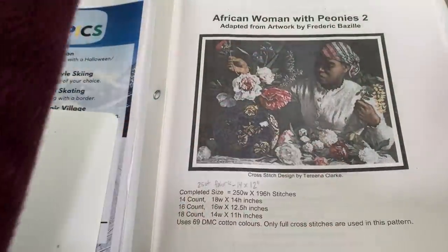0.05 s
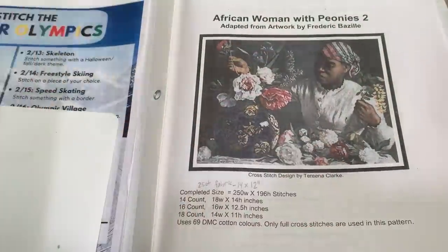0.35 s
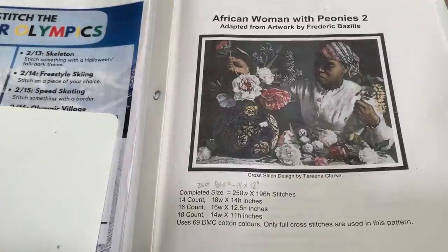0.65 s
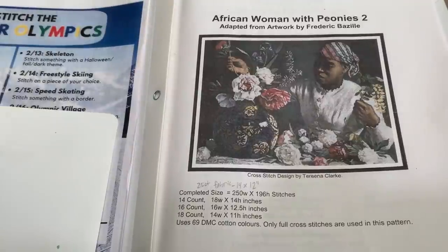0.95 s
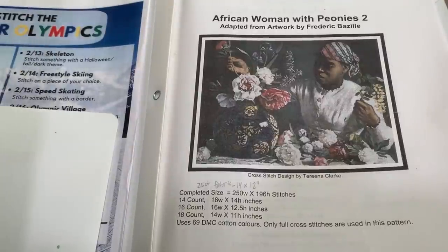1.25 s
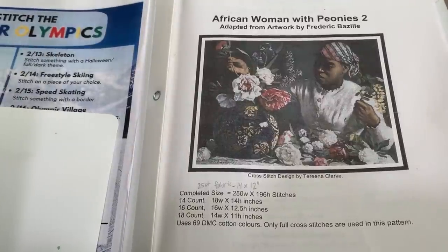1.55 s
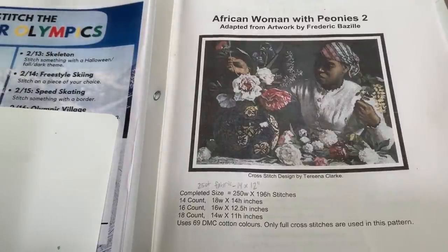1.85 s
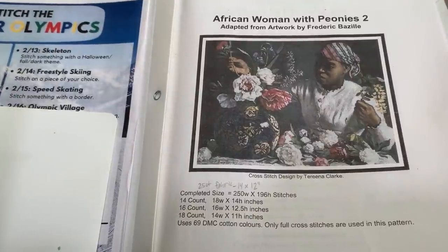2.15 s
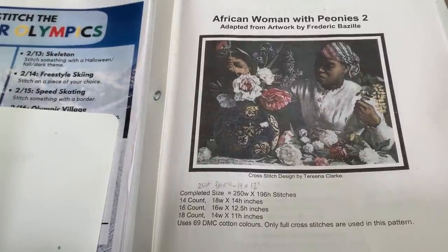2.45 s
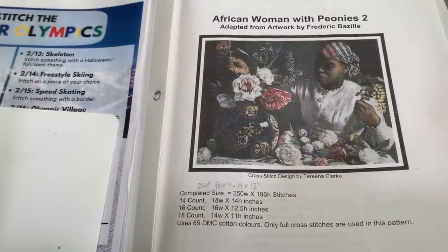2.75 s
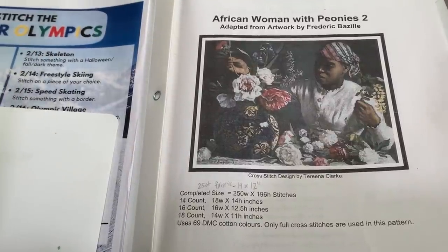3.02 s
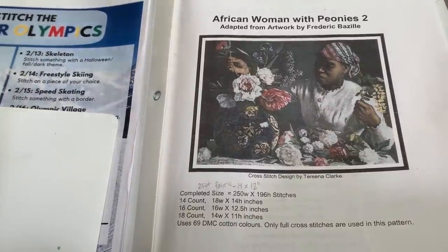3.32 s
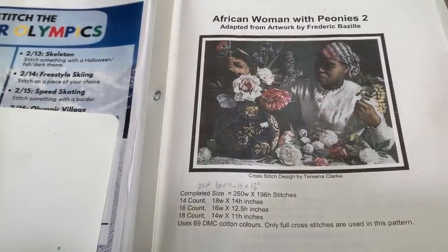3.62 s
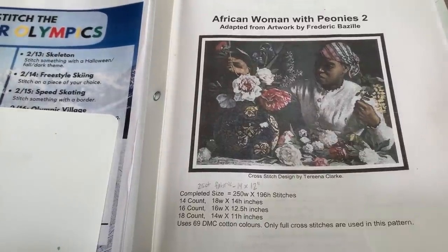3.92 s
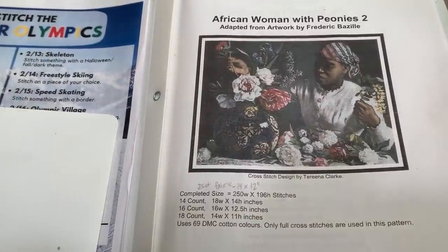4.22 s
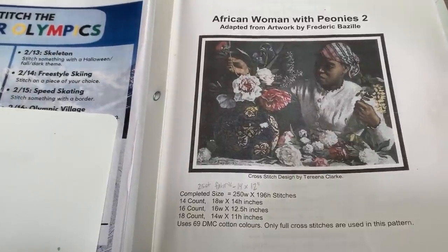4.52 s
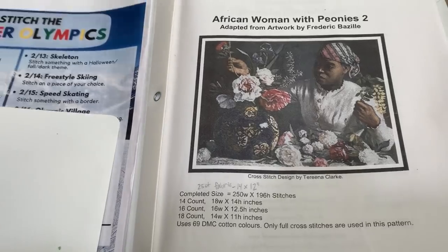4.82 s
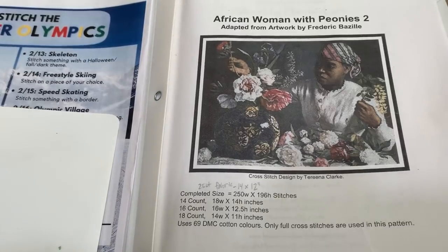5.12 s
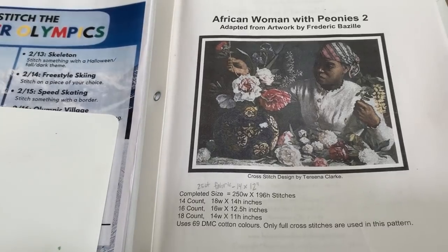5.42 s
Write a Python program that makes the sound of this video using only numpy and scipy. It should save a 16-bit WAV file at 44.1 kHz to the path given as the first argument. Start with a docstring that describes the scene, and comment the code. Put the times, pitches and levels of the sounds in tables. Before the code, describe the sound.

Plastic page sleeves rustle, scrape and crackle as hands leaf through a binder, with a few pages slapping down.

```python
"""A small room, close up on a ring binder: hands leaf through paper pages in plastic sleeves.
Friction, a stream of tiny slips, makes the sleeves scrape, hiss and rasp; the bending sheets flutter
and creak. Fingers brush the pages and the heel of the hand rubs the binder. Now and then a sleeve
crackles, the cover is bumped, or a sheet snaps or slaps down and thumps the stack.
Two microphone ports hear it all in stereo, with quick echoes off the desk and a short room tail."""
import sys
import numpy as np
from scipy import signal
from scipy.fft import rfft, irfft
from scipy.io import wavfile
from scipy.ndimage import uniform_filter1d

SR = 44100
rng = np.random.default_rng(int(sys.argv[2]) if len(sys.argv) > 2 else 0)


def dump(signal):
    """Clip the signal to [-1, 1] and save it as 16-bit WAV at the path in sys.argv[1]."""
    limited = np.clip(np.atleast_2d(signal).T, -1, 1)
    pcm = np.round(limited * 32767).astype(np.int16)
    wavfile.write(sys.argv[1], SR, pcm)


N = 250047
T = np.arange(N) / SR
HZ = np.fft.rfftfreq(N, 1 / SR)


def gain_of(db):
    """Decibels to amplitude."""
    return 10 ** (np.asarray(db) / 20)


def unit_rms(x):
    """Scales to rms 1."""
    return x / np.sqrt(np.mean(x ** 2) + 1e-20)


def curve(points, hz, column=1):
    """One column of a table, joined by straight lines over log frequency."""
    table = np.array(points, float)
    return np.interp(np.log(hz + 1), np.log(table[:, 0] + 1), table[:, column])


def equalise(x, spectrum):
    """Zero-phase EQ along a curve of (f/Hz, level/dB)."""
    return irfft(rfft(x) * gain_of(curve(spectrum, HZ)), N)


def add(mix, start, sound):
    """Lays a sound into the mix at start seconds."""
    part = mix[max(0, round(start * SR)):][:len(sound)]
    part += sound[:len(part)]


def wander(rate):
    """Smooth random drift of rms 1 that changes about rate times a second."""
    return unit_rms(irfft(rfft(rng.standard_normal(N)) * np.exp(-(HZ / rate) ** 2), N))


def resonate(x, hz, width_hz):
    """A steep resonance that follows the pitch curve hz."""
    turn = np.exp(2j * np.pi * np.cumsum(hz) / SR)
    pole = np.exp(-np.pi * width_hz / SR)
    return (turn * signal.lfilter([(1 - pole) ** 2], [1, -2 * pole, pole * pole], x / turn)).real


def binder_colour(x, spectrum, size=4096):
    """Minimum-phase EQ: a spectrum with the binder's hollow resonances on top."""
    # resonances of the open binder and the space above it: f/Hz, width/Hz, level/dB
    hollow = [(297, 44, 2), (655, 190, 2), (924, 190, 4), (1720, 165, 7), (2660, 700, 8), (3400, 230, -4)]
    hz = np.fft.rfftfreq(size, 1 / SR)
    db = curve(spectrum, hz) + sum(peak / (1 + (2 * (hz - f) / width) ** 2) for f, width, peak in hollow)
    log_gain = np.log(gain_of(np.r_[db, db[-2:0:-1]]))
    taps = np.fft.ifft(np.exp(np.conj(signal.hilbert(log_gain)))).real[:size // 2]
    return signal.fftconvolve(x, taps)[:len(x)]


def slips(per_s, spread_db, smooth, judder_db, judder_hz):
    """Friction: tiny slips of uneven size over smooth rubbing, coming in clumps."""
    sizes = gain_of(spread_db * np.minimum(rng.exponential(1, N), np.pi)) * rng.choice([-1, 1], N)
    clicks = unit_rms(sizes * (rng.random(N) < per_s / SR))
    return (clicks + smooth * rng.standard_normal(N)) * gain_of(judder_db * wander(judder_hz))


def patchy(x, depth_db, bins, frames):
    """As the sheet bends, the bands that it radiates best come and go."""
    bands = signal.stft(x, nperseg=1024, noverlap=768)[2]
    patches = rng.standard_normal(bands.shape)
    for axis, length in ((0, bins), (1, frames), (1, frames)):
        patches = uniform_filter1d(patches, length, axis)
    return signal.istft(bands * gain_of(depth_db * unit_rms(patches)), nperseg=1024, noverlap=768)[1][:N]


def swell(start, rise, hold, fade):
    """One hand movement gathers speed, holds, then falls 20 dB in fade seconds (25 ms at least)."""
    rising = np.clip((T - start) / max(rise, 1 / SR), 0, 1) ** 1.14
    stopping = np.maximum(T - start - rise - hold, 0) / max(fade, .025)
    return rising * gain_of(-20 * np.minimum(stopping ** 1.024, 10))


def envelopes(strokes):
    """One envelope for each level column of a table of strokes; overlaps add in power."""
    return np.sqrt(sum(np.outer(gain_of(levels), swell(start, rise, hold, fade)) ** 2
                       for start, rise, hold, fade, *levels in strokes))


def flutter(pressed):
    """Pressing stiffens a bent sheet and lifts its two resonances; slack, it flaps loosely."""
    # tone of the loose flapping: f/Hz, level/dB
    flap_tone = [(20, -55.5), (45, -14), (80, -4.5), (150, 3), (300, -8.5), (420, -16), (650, -16),
                 (1500, -50.5)]
    slack_hz, pressed_hz = 175, 359
    pitch_hz = (slack_hz + (pressed_hz - slack_hz) * pressed) * np.exp(0.14 * wander(17.6))
    flaps = slips(per_s=260, spread_db=1.5, smooth=0.61, judder_db=0.5, judder_hz=56)
    fundamental = unit_rms(resonate(flaps, pitch_hz, width_hz=68))
    overtone = pressed * gain_of(-14.5) * unit_rms(resonate(flaps, 1.95 * pitch_hz, width_hz=210))
    wobble = signal.sosfilt(signal.butter(2, 100, "high", fs=SR, output="sos"), fundamental + overtone)
    loose = gain_of(4.5) * (1 - pressed)
    return (unit_rms(wobble) + loose * unit_rms(binder_colour(flaps, flap_tone))) / np.hypot(1, loose)


def scrape(pressed, lightness_db):
    """An edge scrapes and small creases give way; its ring sinks when pressed and wanders as it bends."""
    # tone of the scraping edge: f/Hz, level/dB
    edge_tone = [(150, -19.5), (400, -12), (680, -14.5), (900, 3.5), (1400, -2), (2000, 0), (2800, -4.5),
                 (3600, -6), (5000, -11), (8000, -13.5)]
    slack_hz, pressed_hz = 1520, 1080
    friction = slips(per_s=600, spread_db=3.3, smooth=.55, judder_db=1.3, judder_hz=80)
    crinkles = slips(per_s=110, spread_db=-1, smooth=0, judder_db=0.5, judder_hz=7.8)
    drive = friction + gain_of(-9.5) * crinkles
    ring_hz = (slack_hz + (pressed_hz - slack_hz) * pressed) * np.exp(0.12 * wander(30))
    ring = gain_of(-15) * unit_rms(resonate(drive, ring_hz, width_hz=800))
    edge = unit_rms(binder_colour(patchy(drive, depth_db=2.8, bins=4, frames=6), edge_tone)) + ring
    # a light touch scrapes brighter: tilt around 2 kHz
    tilt_db = np.clip(1.14 * lightness_db - 1.5, -5, 5)
    low = irfft(rfft(edge) / (1 + (HZ / 2000) ** 4), N)
    high = edge - low
    low_gain, high_gain = gain_of(-tilt_db), gain_of(tilt_db)
    return (low_gain * low + high_gain * high) / np.hypot(low_gain * low.std(), high_gain * high.std())


def hiss():
    """The plastic faces slip over each other in a bright, shifting hiss."""
    # tone of the sliding faces: f/Hz, level/dB
    face_tone = [(1000, -33), (3000, -11.5), (4100, -5), (4700, -6.5), (5500, -4.5), (7400, -5), (8600, 2),
                 (10200, -1.5), (11300, -2.5), (13300, -2.5), (14500, -2.5), (15800, -3)]
    faces = slips(per_s=2200, spread_db=3.2, smooth=.7, judder_db=1.3, judder_hz=30)
    return unit_rms(binder_colour(patchy(faces, depth_db=4.0, bins=6, frames=7), face_tone))


def sliding():
    """Each stroke of a sleeve over the stack blends flutter, scrape and hiss under a wavering hand."""
    # sleeve strokes: t/s, rise/s, hold/s, fade/s, flutter/dB, scrape/dB, hiss/dB
    strokes = [(0.0, 0.001, 0.02, 0.09, -72, -55, -51.5), (.17, 0.084, 0.046, 0.17, -82, -84, -56),
               (.272, 0.015, .012, 0.06, -76, -58.5, -57), (.383, 0.0016, 0.11, 0.14, -61, -59, -44.5),
               (.495, 0.033, 0.16, 0.12, -65, -59, -46), (.8, 0.032, 0.059, 0.04, -70.5, -63, -59),
               (1.02, 0.03, 0.02, 0.06, -66, -60.5, -59), (1.308, 0.0084, 0.0052, 0.025, -74, -72, -70.5),
               (1.41, 0.11, 0.18, 0.8, -72, -60, -54), (1.835, 0.064, 0.052, 0.35, -49.5, -56, -49),
               (2.174, 0.058, 0.11, -0.04, -71, -62, -59), (2.37, 0.1, 0.044, 0.13, -71.5, -55, -48.5),
               (2.65, 0.091, 0.033, 0.17, -61.5, -51, -44.5), (2.86, 0.043, 0.081, 0.06, -62, -53.5, -44),
               (3.03, 0.071, 0.076, 0.18, -52.5, -51, -47), (3.08, 0.15, 0.068, 0.04, -68, -42.5, -42.5),
               (3.25, 0.032, 0.037, 0.06, -56, -43.5, -60), (3.369, 0.012, 0.018, 0.1, -58, -37.5, -56),
               (3.39, 0.028, 0.039, 0.04, -49, -35.5, -37.5), (3.47, 0.01, 0.02, 0.34, -68.5, -60.5, -55.5),
               (3.58, 0.017, 0.017, 0.1, -59, -56, -53), (3.605, 0.07, 0.057, 0.04, -44.5, -35.5, -35.5),
               (3.745, 0.0061, 0.0085, 0.07, -55, -57.5, -52), (3.779, 0.02, 0.031, 0.38, -68, -63, -62),
               (3.934, 0.24, 0.04, 0.15, -53, -45.5, -43.5), (4.14, 0.0081, 0.093, 0.1262, -63, -44, -39.5),
               (4.192, 0.024, 0.011, 0.058, -69, -35.5, -27.5), (4.242, 0.008, 0.0088, 0.03, -58, -41, -36),
               (4.303, 0.0086, 0.015, 0.025, -37, -46.5, -33.5),
               (4.345, 0.016, 0.24, -0.04, -62.5, -70, -82.5),
               (4.525, 0.0088, 0.023, 0.0552, -57, -46.5, -42.5),
               (4.575, 0.011, 0.0064, 0, -69.5, -58.5, -49.5), (4.672, 0.016, 0.018, 0.13, -51, -50, -49),
               (4.787, 0.015, 0.021, 0.026, -47, -53.5, -51.5),
               (4.845, 0.003, 0.012, 0.0259, -40.5, -47, -39), (4.86, 0.0072, 0.028, 0.19, -62, -54.5, -50),
               (5.03, 0.13, 0.054, 0.11, -78, -53, -41.5), (5.3, 0.026, 0.05, 0.4, -88, -61.5, -53),
               (5.385, 0.057, 0.037, 0.07, -84.5, -61, -48), (5.508, 0.048, 0.076, 0, -100, -66, -51.5)]
    rest = gain_of([[-77.5], [-84], [-93]])  # the hands never lie quite still
    waver_db = wander(24)
    flutter_gain, scrape_gain, hiss_gain = np.hypot(envelopes(strokes), rest) * gain_of(waver_db)
    pressed = scrape_gain / (scrape_gain + gain_of(-47))  # 0 slack, 1 fully pressed
    lightness_db = 20 * np.log10(hiss_gain / scrape_gain)  # a light touch has more hiss than scrape
    return (flutter_gain * flutter(pressed) + scrape_gain * scrape(pressed, lightness_db)
            + hiss_gain * hiss())


def second_rub():
    """A quieter second rub on the same strokes, there to widen the stereo."""
    # tone of the second rub, with narrow bands cut near 4.7 and 8.9 kHz: f/Hz, level/dB
    rub_tone = [(150, -30), (600, -11), (2000, -12), (3700, -8), (4200, -15), (4500, -36), (5000, -36),
                (5600, -10), (7000, -19), (8400, -19), (8900, -30), (9600, -17), (15000, -12)]
    return equalise(sliding(), rub_tone)


def still_air():
    """A faint, steady bed of room tone, mostly low rumble."""
    # tone of the still air: f/Hz, level/dB
    air_tone = [(20, -16), (60, 26), (200, -13.5), (500, -5.5), (1500, -19.5), (4000, -1), (15000, -11.5)]
    return gain_of(-76.5) * unit_rms(binder_colour(rng.standard_normal(N), air_tone))


def cover_bumps():
    """Bumps ring the hollow cover for a moment."""
    # bumps on the cover: t/s, level/dB
    bumps = [(.002, -40.5), (.012, -65), (.024, -39.5), (.438, -50)]
    # modes of the cover: f/Hz, level/dB, t60/s
    modes = [(442, -8, 0.077), (517, 0, 0.069), (650, 0.5, 0.05), (720, 0, 0.058), (855, -4, 0.058),
             (1390, 3, 0.024), (1540, -12, 0.05)]
    t, out = np.arange(SR // 4) / SR, np.zeros(N)
    for start, db in bumps:
        ring = sum(gain_of(level - 60 * t / t60) * np.sin(2 * np.pi * f * rng.uniform(1.0, 1.02) * t)
                   for f, level, t60 in modes)
        add(out, start, gain_of(db) * ring)
    return out


def impact(spectrum, rattle, decay_s, lag_ms, sink, size=8192):
    """A push and a dying rattle, pitched down by the ratio sink; has the energy of 10 ms at rms 1."""
    t, hz = np.arange(size) / SR, np.fft.rfftfreq(size, 1 / SR)
    push = binder_colour(1. * (t == 0), spectrum)
    burst = rng.standard_normal(size) * np.exp(-t / decay_s)
    tail = binder_colour(burst, [(f * sink, db) for f, db in spectrum])
    wave = unit_rms(push) + rattle * unit_rms(tail)
    # the sheets carry low bending waves slower, so the pitch drops
    lag_s = lag_ms / 1000 * np.sqrt(1000 / (hz + 60))
    wave = irfft(rfft(wave) * np.exp(-2j * np.pi * np.cumsum(lag_s) * hz[1]), size)
    wave *= np.minimum(1, 2 * (1 - t / t[-1]))  # fade out
    return wave / np.linalg.norm(wave) * np.sqrt(SR / 100)


def slaps():
    """Each snap or slap layers a thump of the stack, a knock of the sheet and a tick of plastic."""
    # snaps and slaps: t/s, thump/dB, knock/dB, tick/dB, thump pitch/Hz, knock pitch/Hz
    hits = [(0.0112, -49, -45, -33, 553, 900), (0.0196, -54, -44, -44, 526, 1500),
            (0.0256, -56, -56, -37.5, 526, 900), (0.437, -40.5, -57, -78, 264, 900),
            (0.53, -64, -55, -75, 300, 900), (1.6028, -24, -31.5, -37, 198, 1020),
            (1.6832, -28, -40.5, -48, 187, 1040), (2.0997, -38.5, -40.5, -38, 320, 2020),
            (2.11, -38.5, -67, -45, 250, 600), (2.311, -46.5, -61.5, -69, 92.6, 694),
            (2.578, -56, -86, -77.5, 141, 900), (2.751, -41.5, -47.5, -52, 131, 620),
            (2.9386, -46.5, -31.5, -30, 290, 1820), (3.3796, -55, -45, -69, 373, 1220),
            (3.444, -44.5, -53, -60, 203, 1000), (3.462, -56, -47, -62, 310, 1120),
            (3.568, -56, -60, -70, 161, 1500), (3.763, -36.5, -46.5, -72, 125, 1000),
            (3.835, -45, -52, -70, 190, 1200), (4.288, -45, -40.5, -40, 300, 1510),
            (4.304, -34.5, -31.5, -44, 243, 1630), (4.442, -44.5, -52, -85, 308, 1068),
            (4.450, -45, -52, -78, 280, 2570), (4.507, -47.5, -47, -61, 283, 1190),
            (4.5362, -40.5, -48.5, -45.5, 166, 1800), (4.651, -41, -81, -95, 178, 600),
            (4.7016, -24, -26.5, -26.5, 183, 1600), (4.7052, -32.5, -30.5, -31, 198, 616),
            (4.782, -38.5, -48, -50, 203, 470), (4.8487, -36, -40, -38.5, 257, 2650),
            (4.8549, -34, -41, -34.5, 194, 1000), (4.931, -45, -62.5, -70.5, 112, 600),
            (5.248, -61.5, -72, -78, 323, 600), (5.448, -63, -74, -68, 270, 900)]
    # tone of the stack's thump at a pitch of 200 Hz: f/Hz, level/dB
    thump_tone = [(20, -47.5), (45, -12), (80, -1), (160, 2.5), (270, -1), (400, -10), (650, -17.5),
                  (1500, -43.5)]
    # tone of the sheet's knock: f/Hz, level/dB
    knock_tone = [(150, -20.5), (400, -2.5), (660, 4.5), (950, -2), (1300, -0.5), (1900, -2.5), (2900, -2),
                  (3800, -5.5), (6000, -11), (10000, -47)]
    # tone of the plastic's tick: f/Hz, level/dB
    tick_tone = [(1200, -37.5), (3500, -10), (4800, 12.5), (7300, -12.5), (8800, 7.5), (10500, -7),
                 (12300, -0.5), (15800, -11.5)]
    out, hz = np.zeros(N), np.geomspace(100, 12000, 60)
    for start, thump_db, knock_db, tick_db, thump_hz, knock_hz in hits:
        tuned_thump = [(f * thump_hz / 200, db) for f, db in thump_tone]
        for delay_s, drop_db in ((0, 0), (0.031, -19.5)):  # the springy stack rebounds once
            thump = impact(tuned_thump, rattle=0.57, decay_s=0.018, lag_ms=2.404, sink=0.46)
            add(out, start + delay_s, gain_of(thump_db + drop_db) * thump)
        peak_db = 10.5 * np.exp(-(np.log2(hz / knock_hz) / 0.49) ** 2)
        tuned_knock = list(zip(hz, curve(knock_tone, hz) + peak_db))
        knock = impact(tuned_knock, rattle=1.0, decay_s=0.0058, lag_ms=0.674, sink=0.94)
        tick = impact(tick_tone, rattle=.6, decay_s=.0022, lag_ms=.5, sink=.95)
        add(out, start, gain_of(knock_db) * knock + gain_of(tick_db) * tick)
    return out


def swish():
    """Countless tiny slips between two slick faces: a dense, silky sheen high in the treble."""
    # plastic gliding on plastic: t/s, rise/s, hold/s, fade/s, level/dB
    glides = [(.19, 0.034, 0.081, 0, -60), (1.035, 0.049, 0.068, -0.02, -55.5),
              (1.312, 0.0078, 0.0042, -0.5, -59), (1.345, 0.039, 0.015, 0.15, -54),
              (1.48, 0.046, .06, 0.2, -54), (3.08, 0.088, 0.13, 0.03, -41), (3.96, 0.2, 0.12, -0.22, -43)]
    # tone of the glide: f/Hz, level/dB
    glide_tone = [(3000, -46), (7500, -22), (9000, -7.5), (11200, 1), (12400, -1), (13500, -6.5),
                  (15500, -6.5)]
    faces = slips(per_s=4900, spread_db=2.5, smooth=0.68, judder_db=1.7, judder_hz=60)
    return envelopes(glides)[0] * unit_rms(binder_colour(faces, glide_tone))


def rasp():
    """Fine slips ring a sleeve's stiff edge in a half-whistling band that wavers as it bends."""
    # rasping strokes: t/s, rise/s, hold/s, fade/s, level/dB, pitch/Hz
    strokes = [(.27, 0.018, 0.012, 0.12, -59, 2870), (.383, 0.008, 0.1, 0.5, -62, 2800),
               (.51, 0.049, 0.12, 0.0547, -47.5, 2730), (.77, 0.018, .02, .03, -60.5, 2700),
               (1.45, .05, 0.086, 0.1, -63, 1720), (2.42, 0.046, .05, .05, -57, 1720),
               (2.72, .04, 0.18, 0.25, -58, 1720), (3.15, 0.034, 0.07, 0.15, -47, 2700),
               (4.19, .02, 0.018, 0.08, -49, 3240), (4.93, .02, 0.13, 0.22, -60.5, 2650),
               (5.17, .03, 0.022, 0.03, -57, 2700), (5.35, .06, .045, -0.1, -60.5, 1770)]
    # modes of the edge: multiple of the pitch, width/Hz, level/dB
    modes = [(1, 420, 1.5), (1.33, 500, -7)]
    drive = slips(per_s=1300, spread_db=2.0, smooth=1.0, judder_db=1.5, judder_hz=33)
    starts, rises, *_, pitches = np.transpose(strokes)
    pitch_hz = np.interp(T, starts + rises, pitches) * np.exp(0.0083 * wander(14))
    ring = sum(gain_of(db) * unit_rms(resonate(drive, multiple * pitch_hz, width_hz))
               for multiple, width_hz, db in modes)
    return envelopes([row[:-1] for row in strokes])[0] * unit_rms(ring)


def crackles():
    """A sleeve sticks and lets go: one crisp click around its own pitch, with no thump."""
    # sleeves letting go: t/s, level/dB, pitch/Hz
    releases = [(0.3883, -47.5, 8100), (0.39, -62, 1160), (.403, -52, 8040), (1.321, -68, 11300),
                (1.405, -60, 11300), (1.7702, -54, 8300), (2.966, -46, 6000), (3.062, -50.5, 1910),
                (3.798, -67, 9100), (3.819, -59, 1090), (3.915, -59, 11500), (3.9414, -48, 9900),
                (3.9763, -51, 1160), (4.009, -63, 1390), (4.021, -60, 1090), (4.045, -58, 1180),
                (4.0907, -41, 2050), (4.128, -46.5, 3000), (4.149, -43, 2200), (4.253, -44, 2590),
                (4.311, -40, 11100), (4.324, -41, 11100), (4.682, -56, 7000), (4.7016, -35, 6700),
                (4.7821, -46.5, 11100), (4.864, -45, 6000)]
    out, hz = np.zeros(N), np.geomspace(100, 16000, 40)
    for start, db, pitch_hz in releases:
        octaves_off = np.abs(np.log2(hz / pitch_hz))
        tone = list(zip(hz, -13.5 * (octaves_off / 0.79) ** 0.81))
        add(out, start, gain_of(db) * impact(tone, rattle=.6, decay_s=.0015, lag_ms=.25, sink=0.98))
    return out


def finger_brush():
    """Skin on a flat page gives a soft, even rush that does not ring the binder."""
    # finger strokes: t/s, rise/s, hold/s, fade/s, level/dB
    strokes = [(.43, .02, 0.23, 0.33, -61.5), (1.03, 0.018, 0.17, -0.2, -61),
               (1.401, 0.014, 0.18, 0.3, -57), (1.838, 0.012, 0.26, 0.9, -56),
               (2.7, 0.045, 0.087, 0.33, -56)]
    # tone of brushing skin: f/Hz, level/dB
    skin_tone = [(300, -10), (650, -11.5), (1000, -1.5), (2000, 2.5), (3300, -3), (5000, -2.5), (8000, -33),
                 (15000, -30)]
    skin = slips(per_s=4600, spread_db=-5, smooth=0.89, judder_db=3.0, judder_hz=24)
    return envelopes(strokes)[0] * unit_rms(equalise(skin, skin_tone))


def hand_rub():
    """The heel of the hand drags on the binder in soft, low judders."""
    # drags of the hand: t/s, rise/s, hold/s, fade/s, level/dB
    strokes = [(2.72, 0.015, .11, 0.24, -58.5), (2.93, 0.014, 0.034, -0.05, -53),
               (3.015, 0.03, 0.22, -0.1, -52), (4.045, 0.018, 0.062, 0.03, -46)]
    # tone of the drag: f/Hz, level/dB
    drag_tone = [(40, -28), (100, -5.5), (170, 6), (230, -12), (310, -8), (450, -14.5), (900, -29.5),
                 (3000, -64)]
    drag = slips(per_s=150, spread_db=1.5, smooth=0.8, judder_db=2.0, judder_hz=64)
    return envelopes(strokes)[0] * unit_rms(binder_colour(drag, drag_tone))


def creaks():
    """A resonance of the bending sheet falls as a buckle spreads out."""
    # buckles: t/s, length/s, first pitch/Hz, last pitch/Hz, level/dB
    buckles = [(2.899, 0.011, 1130, 444, -57), (3.971, 0.054, 984, 750, -55.5),
               (4.006, 0.016, 1530, 940, -60), (4.009, 0.03, 454, 310, -53.5),
               (4.044, 0.0102, 1180, 650, -50)]
    out = np.zeros(N)
    for start, length, first_hz, last_hz, db in buckles:
        size = round(length * SR)
        drive = rng.standard_normal(size) * np.linspace(1, .2, size)
        ring = resonate(drive, np.geomspace(first_hz, last_hz, size), width_hz=150)
        add(out, start, gain_of(db) * unit_rms(ring * signal.windows.tukey(size, .3)))
    return out


def mic_ports(x, size=1024):
    """Sound meets the two ports out of step; the camera body shades the left one in the mids."""
    # left port against right: f/Hz, phase lead/rad, level/dB
    port_offsets = [(30, 0, -.7), (300, -.2, 0), (600, -.8, -2), (760, -1.7, -3), (860, -4, -4),
                    (1000, -5.1, -3), (1400, -6.1, -1.5), (1900, -5.7, -3.5), (2300, -4.5, -3.5),
                    (2900, -4.3, -1.5), (3400, -5.5, -1), (4300, -3.17, 0), (5150, -3.05, 0), (6600, 0, 0),
                    (8900, 3.14, 0), (11100, 6.28, 0), (13200, 9.42, 0), (15400, 12.57, 0)]
    f, lead, balance_db = np.transpose(port_offsets)
    half = np.exp(.5j * np.interp(HZ, f, lead)) * gain_of(np.interp(HZ, f, balance_db) / 2)
    taps = np.roll(irfft(np.array([half, 1 / half]), N), size // 2, 1)[:, :size + 1]
    return signal.fftconvolve(np.array([x, x]), taps, "same", axes=1)


def near_echoes(x, count=24, size=400):
    """Pages and desk throw back a few quick echoes, different for each port."""
    # tone of the quick echoes, with narrow bands cut near 4.7 and 8.9 kHz: f/Hz, level/dB
    echo_tone = [(100, -30), (500, -13), (2000, -13), (3600, -12), (4200, -17), (4500, -34), (5000, -34),
                 (5400, -14), (7000, -17), (8400, -17), (8900, -27), (9500, -17), (11000, -17),
                 (15000, -13)]
    taps = np.zeros((2, size))
    delays = rng.integers(size // 16, size, (2, count))
    np.put_along_axis(taps, delays, rng.standard_normal((2, count)), 1)
    taps *= np.exp(-2 * np.arange(size) / size)
    taps /= np.linalg.norm(taps, axis=1, keepdims=True)
    return signal.fftconvolve(equalise(x, echo_tone)[None], taps, axes=1)[:, :N]


def room(x, count=1000, step=20):
    """Sparse echoes, each band dying at its own speed; the bass is alike at both ports."""
    # short room tail, with a band cut near 4.8 kHz: f/Hz, t60/s, level/dB
    tail = [(61, 0.29, -27), (250, 0.36, -17.5), (510, 0.22, -10), (900, 0.11, -10), (2680, 0.26, -17.5),
            (4100, 0.23, -12), (4800, 0.15, -37), (6270, 0.2, -31), (14200, 0.17, -47)]
    taps = np.zeros((2, SR))
    delays = 130 + step * np.arange(count) + rng.integers(0, step, (2, count))
    np.put_along_axis(taps, delays, rng.choice([-1., 1.], delays.shape), 1)
    hz, t, bands = signal.stft(taps, SR, nperseg=256)
    alike = 1 / (1 + (hz[:, None] / 550) ** 4)
    bands[1] = alike * bands[0] + np.sqrt(1 - alike ** 2) * bands[1]
    decay_rate = np.log(1000) / curve(tail, hz)[:, None]
    level = gain_of(curve(tail, hz, column=2))[:, None]
    bands *= level * np.exp(-decay_rate * t) * np.sqrt(2 * decay_rate * step / SR)
    return signal.fftconvolve(x[None], signal.istft(bands, SR, nperseg=256)[1], axes=1)[:, :N]


def scene():
    """The close sounds of the binder, widened by a second rub, quick echoes and the room tail."""
    direct = (still_air() + sliding() + swish() + finger_brush() + hand_rub() + rasp()
              + creaks() + crackles() + slaps() + cover_bumps())
    wide = mic_ports(second_rub()) * np.array([[1], [-1]])  # right polarity flipped for width
    return gain_of(-1.31) * (mic_ports(direct) + wide) + near_echoes(direct) + room(direct)


def record(dry):
    """A bass roll-off and a steep cut of the top treble."""
    low_cut_hz, high_cut_hz = 50, 15830
    dry = signal.sosfilt(signal.butter(3, low_cut_hz, "high", fs=SR, output="sos"), dry)
    return signal.oaconvolve(dry, signal.firwin(511, high_cut_hz, window=("kaiser", 9), fs=SR)[None], "same")


dry = scene()
out = record(dry)
dump(out)
```